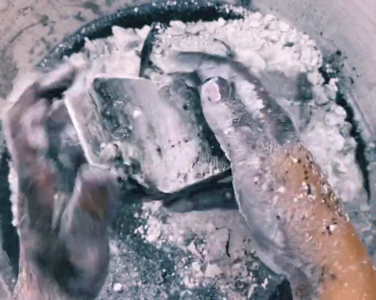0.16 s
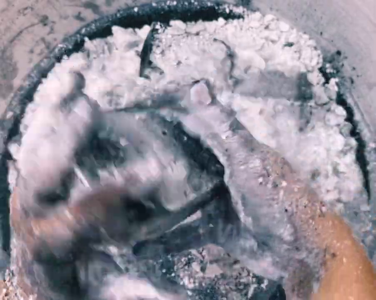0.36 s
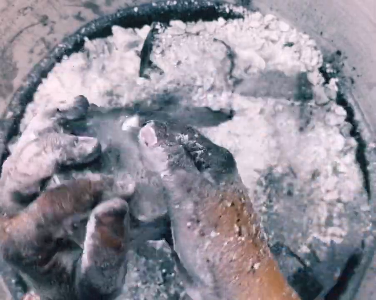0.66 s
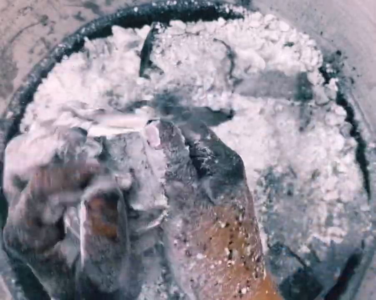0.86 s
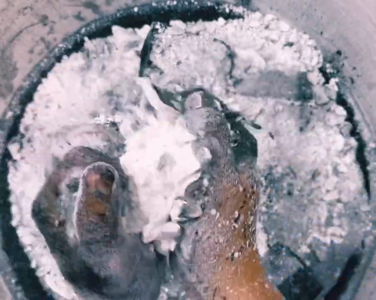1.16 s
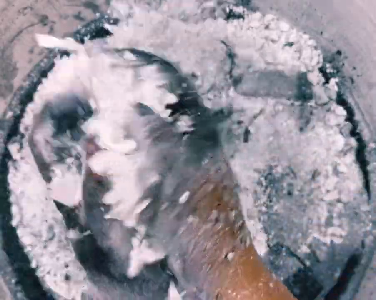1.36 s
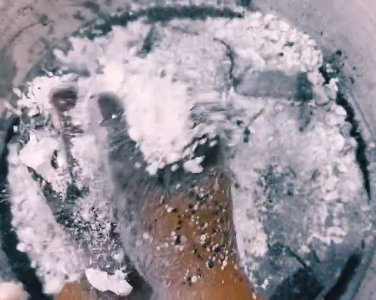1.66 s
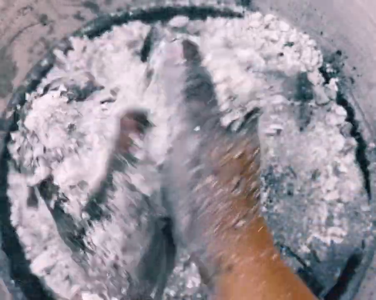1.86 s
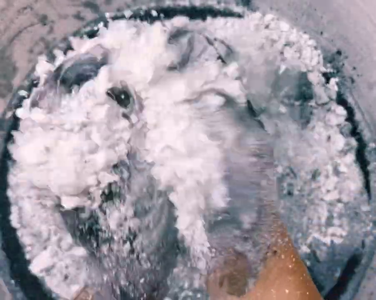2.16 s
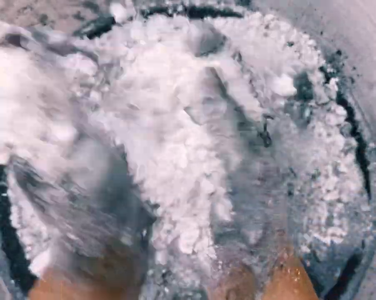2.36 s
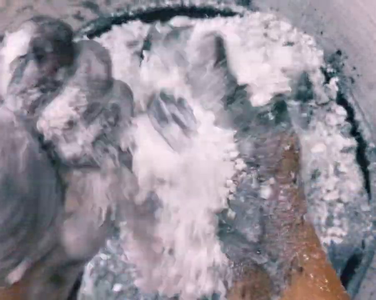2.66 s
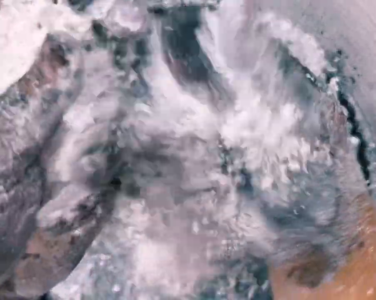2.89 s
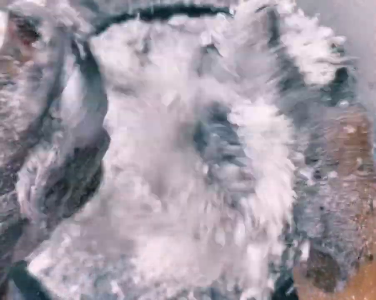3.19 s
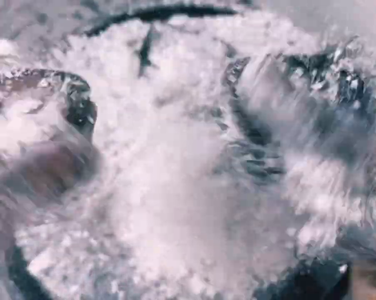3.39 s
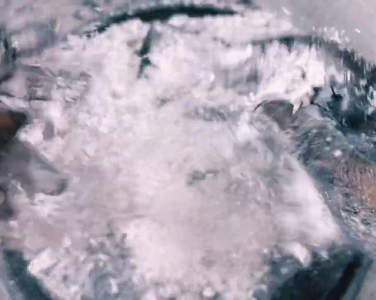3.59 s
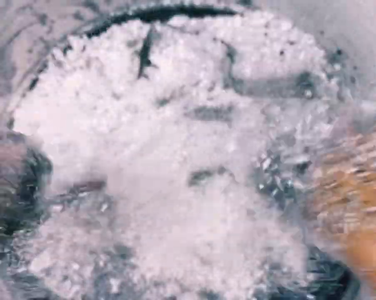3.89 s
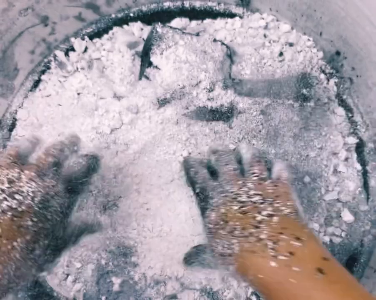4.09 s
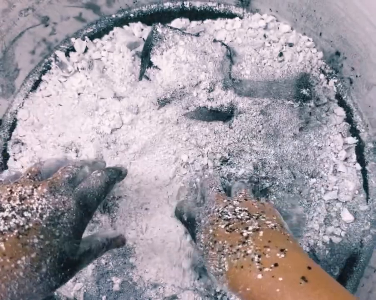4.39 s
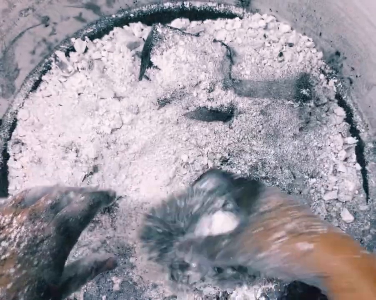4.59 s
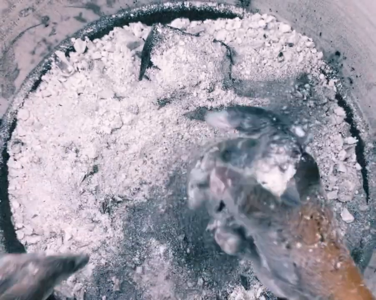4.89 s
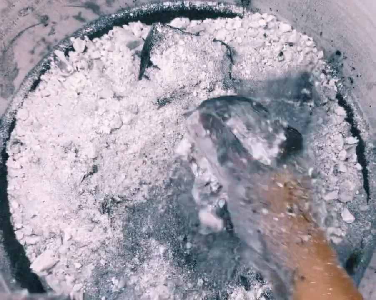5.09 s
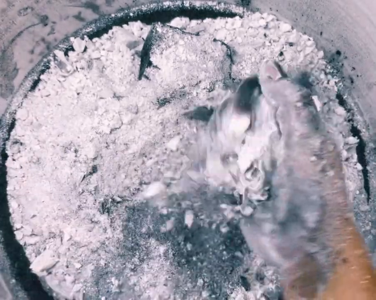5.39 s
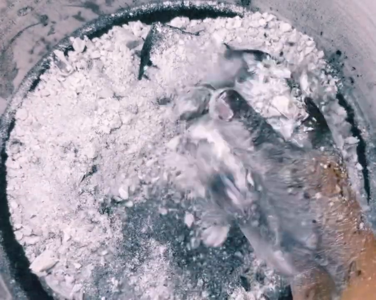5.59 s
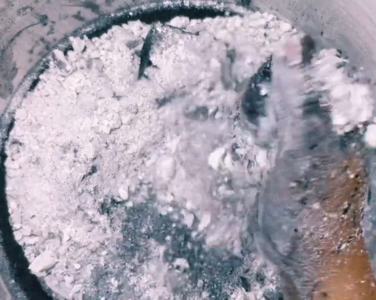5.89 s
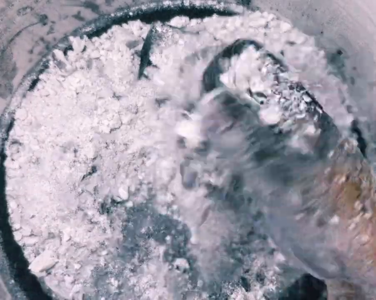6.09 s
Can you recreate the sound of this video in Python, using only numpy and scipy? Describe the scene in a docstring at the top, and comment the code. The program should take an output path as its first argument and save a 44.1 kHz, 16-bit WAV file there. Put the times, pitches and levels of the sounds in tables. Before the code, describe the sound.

In a small, faintly humming room, hands rub a chalk block and crush it with crisp cracks and a crackling collapse, heard up close. Gritty crunches follow as pieces fall, knocking against a plastic bowl and making its bottom boom. The crumbling thins, a hand sweeps past with a low puff of air and a thump, and a second burst of snapping trails off into crumbs and light clinks of charcoal.

```python
"""Fingers rasp over dry chalk, close by, as a hand sweeps past and crumbs trickle into a plastic bowl.
A block cracks in sharp snaps and collapses in a rush of tiny fractures; squeeze after squeeze grinds it
to grit. Lumps knock on the bowl's wall and heavy handfuls make its bottom boom. Late on, more chalk
snaps and hard bits of charcoal clink. A small room hums behind."""
import sys
import numpy as np
from scipy import signal
from scipy.fft import rfft, irfft
from scipy.io import wavfile

SR = 44100
rng = np.random.default_rng(int(sys.argv[2]) if len(sys.argv) > 2 else 0)


def persist_wave(psi):
    """Save psi, clipped to +-1, as 16-bit WAV."""
    counts = np.round(np.clip(psi, -1, 1) * 32767).astype(np.int16)
    wavfile.write(sys.argv[1], SR, np.atleast_2d(counts).T)


N = 275623
TIME_S = np.arange(N) / SR
AGE_S = TIME_S[:SR // 2]  # time since an onset


def undb(db):
    """Decibels to gain."""
    return 10 ** (np.asarray(db) / 20)


def unit(x):
    """Scale to rms 1."""
    return x / np.sqrt(np.mean(x ** 2) + 1e-18)


def curve(points):
    """(time [s], value) points, interpolated per sample."""
    return np.interp(TIME_S, *np.transpose(points))


def add(out, time_s, sound):
    """Mix a sound in at time_s."""
    i = max(int(time_s * SR), 0)
    out[i:i + len(sound)] += sound[:max(N - i, 0)]


def colour(x, points, size=8192):
    """Minimum-phase filter through (frequency [Hz], gain [dB]) points; white noise keeps its level."""
    hz, db = np.transpose(points)
    octave = np.log2(np.maximum(np.fft.rfftfreq(size, 1 / SR), 1))
    outside_oct = np.abs(octave - np.clip(octave, np.log2(hz[0]), np.log2(hz[-1])))
    gain = undb(np.interp(octave, np.log2(hz), db) - 20 * outside_oct)
    cepstrum = irfft(np.log(gain))[:size // 2]
    cepstrum[1:] *= 2
    response = irfft(np.exp(rfft(cepstrum, size)))
    return signal.fftconvolve(x, response / np.linalg.norm(response))[:len(x)]


def resonate(x, hz, q):
    """Two-pole resonance."""
    hz = min(hz, .3 * SR)
    return signal.lfilter(*signal.iirpeak(hz, max(q, hz / (.4 * SR)), fs=SR), x)


def ring(modes, weights=1, pitch_ratio=1):
    """Decaying sines of a struck object."""
    hz, db, t60_s = np.transpose(modes)
    waves = np.sin(2 * np.pi * np.outer(hz * pitch_ratio, AGE_S))
    decay = np.exp(-np.log(1000) * AGE_S / t60_s[:, None])
    return (undb(db) * weights) @ (waves * decay)


def wander(rate_hz):
    """Random drift, spread near 1, with about rate_hz knots a second."""
    knots_s = np.cumsum(rng.uniform(.4, 1.6, N // 100)) / rate_hz
    return 1.2 * np.interp(TIME_S, knots_s, rng.standard_normal(len(knots_s)))


def burst(hz, q, fade_s):
    """A fragment shivers around its pitch and dies away; energy of a fading unit noise."""
    fade = np.exp(-AGE_S[:SR // 12] / fade_s)
    noise = rng.standard_normal(len(fade))
    shiver = resonate(resonate(noise, hz, q), hz, q) * fade
    return shiver * np.linalg.norm(fade) / np.linalg.norm(shiver)


def grains(per_s, spread_db, fade_s, low_hz=1200, high_hz=15000, bands=36, size=320):
    """Tiny fractures at random moments, many faint, few strong; rms 1."""
    out = np.zeros(N)
    per_band = int(per_s * N / SR / bands)
    for hz in np.geomspace(low_hz, high_hz, bands):
        when, chance, side = rng.random((N // bands, 3))[:per_band].T
        strength = undb(-spread_db * np.log(chance + .008)) * np.sign(side - .5)
        clicks = np.bincount((when * N).astype(int), strength, N)
        grain = burst(hz, .9, fade_s)[:size] * np.sqrt(hz)  # wider band, more energy
        out += signal.oaconvolve(clicks, grain)[:N]
    return unit(out)


# finger strokes: (time [s], level [dB], length [s], lowest resonance [Hz])
RUBS = [(0, -42.5, 0.088, 4400), (0.199, -41, 0.17, 4300), (0.448, -41, 0.13, 4030),
        (1.49, -35, 0.021, 3450), (2.7, -48, 0.049, 3700), (2.838, -40, 0.035, 3570),
        (3.655, -46, 0.11, 4400), (4.178, -49, 0.027, 3500), (4.621, -30.5, 0.023, 3800),
        (6.115, -38, 0.04, 3270)]
# rubbed block: (frequency / lowest resonance [ratio], gain [dB])
BLOCK_MODES = [(1, 14.5), (1.48, 10), (2.45, -1.5)]


def rubs(slips_db=-3):
    """Skin drags over chalk: tiny slips merge into a rasp that excites the block."""
    out = np.zeros(N)
    for time_s, db, length_s, hz in RUBS:
        noise = rng.standard_normal(len(AGE_S))
        slips = colour(noise, [(1500, -3), (4000, -1), (11000, 8.5), (16000, 4.5)])
        block = sum(undb(mode_db) * resonate(slips, hz * ratio, q=7) for ratio, mode_db in BLOCK_MODES)
        rasp = unit(unit(block) + undb(slips_db) * unit(slips))
        stroke = np.sqrt(np.abs(np.sin(np.pi * np.minimum(AGE_S / length_s, 1))))
        add(out, time_s, undb(db) * rasp * stroke)
    return out


# crumb flow into the bowl: (time [s], level [dB])
TRICKLE = [(0, -53.5), (0.55, -53.5), (1.0, -40.5), (1.7, -38), (2.15, -43), (2.75, -37.5), (3.02, -44.5),
           (4.0, -46.5), (4.06, -62), (4.5, -59.5), (4.6, -49), (5.5, -46), (5.95, -42), (6.25, -49.5)]
# fingers closing on a lump: (time [s], length [s], grit level [dB], crumb level [dB])
SQUEEZES = [(0.601, 0.031, -26, -31), (0.7, 0.15, -34.5, -60), (0.79, 0.074, -29.5, -48),
            (0.896, 0.056, -33.5, -36.5), (0.978, 0.035, -55, -34.5), (1.097, 0.097, -33.5, -35.5),
            (1.337, 0.042, -38, -25.5), (1.479, 0.041, -32.5, -30.5), (1.83, 0.016, -44, -61),
            (1.917, 0.19, -46, -50), (2.843, 0.071, -38, -43), (3.04, 0.26, -45.5, -46.5),
            (3.911, 0.066, -51, -43), (4.127, 0.24, -63, -52), (4.552, 0.092, -46, -58),
            (4.822, 0.046, -23.5, -28.5), (4.922, 0.18, -39.5, -54), (5.155, 0.052, -43.5, -46),
            (5.634, 0.052, -40.5, -46), (5.919, 0.14, -48, -44.5)]
# fine grit, coarse crumbs: (frequency [Hz], gain [dB])
GRIT_SPECTRUM = [(1100, 3), (1900, 2.5), (3000, 7.5), (4200, 6), (6300, 5.5), (8500, 1), (11000, 3),
                 (14000, 1.5), (16000, -5)]
CRUMB_SPECTRUM = [(120, -25), (260, 16), (500, 8), (900, 6), (1800, 7.5), (3000, -1), (6000, 4.5)]


def kneading(coarse_db=-6, chips_db=10):
    """Grit, chips and crumbs trickle in uneven surges; each squeeze grinds out more."""
    flow = undb(curve(TRICKLE))
    grit_power, crumb_power = flow ** 2, (flow * undb(coarse_db)) ** 2
    for time_s, length_s, grit_db, crumb_db in SQUEEZES:
        force = grip(time_s, length_s)
        grit_power += (undb(grit_db) * force) ** 2
        crumb_power += (undb(crumb_db) * force) ** 2
    surge_db = 1.3 * wander(rate_hz=50)
    fine = grains(per_s=4200, spread_db=3.5, fade_s=.0012)
    grit = unit(colour(fine, GRIT_SPECTRUM)) + undb(chips_db) * chips()
    coarse = grains(per_s=1300, spread_db=3, fade_s=.0017, low_hz=224, high_hz=3370)
    crumbs = unit(colour(coarse, CRUMB_SPECTRUM))
    return (grit * np.sqrt(grit_power) + crumbs * np.sqrt(crumb_power)) * undb(surge_db)


def grip(time_s, length_s, rise_s=.021, relax_s=.039):
    """Force of one squeeze: builds, holds, relaxes."""
    age_s = TIME_S - time_s
    return np.clip(age_s / rise_s, 0, 1) * np.exp(-np.maximum(age_s - length_s, 0) / relax_s)


def chips(per_s=26, spread_db=3, centre_hz=4500, range_oct=1.04):
    """Stray chips break off, each a dry tick at its own pitch."""
    out = np.zeros(N)
    for when, chance, pitch in rng.random((int(per_s * N / SR), 3)):
        tick = burst(centre_hz * 2 ** (range_oct * (2 * pitch - 1)), q=.7, fade_s=.0009)
        add(out, when * N / SR, undb(-spread_db * np.log(chance + .1)) * tick)
    return out


# hand passes that shift the bowl: (time [s], length [s], rumble level [dB], air level [dB])
SWEEPS = [(-.06, 0.13, -35.5, -59), (1.298, 0.5, -30, -59), (3.12, 0.31, -35.5, -45),
          (4.058, 0.38, -32, -26), (4.415, .2, -60, -37.5), (5.094, 0.23, -39.5, -33)]
# bowl rumble: (frequency [Hz], gain [dB])
RUMBLE_SPECTRUM = [(35, -30), (70, 4.5), (100, 3), (150, -5), (190, -12), (240, -15.5), (400, -22.5),
                   (800, -27.5)]


def handling(landing_db=3.5):
    """Falling crumbs rumble the bowl; a sweeping hand swells this and blows air at the microphone."""
    load, draught = undb(curve(TRICKLE) + landing_db), np.zeros(N)
    for time_s, length_s, rumble_db, air_db in SWEEPS:
        speed = np.sin(np.pi * np.clip((TIME_S - time_s) / length_s, 0, 1))
        load = np.hypot(load, undb(rumble_db) * speed)
        draught += undb(air_db) * speed
    rumble = colour(rng.standard_normal(N), RUMBLE_SPECTRUM)
    air = colour(rng.standard_normal(N), [(14, -21), (28, 3), (45, -9), (80, -18), (160, -41)])
    return rumble * load + air * draught


# room background: (frequency [Hz], gain [dB])
HUM_SPECTRUM = [(20, -6), (35, 3.5), (65, 1), (110, -14), (220, -11), (330, -18), (700, -29), (1500, -31),
                (3000, -39), (16000, -37.5)]


def hum(level_db=-42.5):
    """Steady room noise: low hum, faint hiss."""
    return undb(level_db) * colour(rng.standard_normal(N), HUM_SPECTRUM)


# blocks giving way: (time [s], level [dB], fade [s], relative body level [dB])
COLLAPSES = [(0.348, -30, 0.011, -8), (0.596, -19, 0.07, -7.5), (0.652, -28, 0.012, -26),
             (0.83, -23.5, 0.062, -7), (1.14, -24.5, 0.038, -25), (1.36, -33.5, 0.14, 3),
             (2.547, -26, 0.042, -2.5), (4.843, -18.5, 0.021, -3), (4.92, -25, 0.04, -12.5),
             (5.595, -30, 0.024, -1.5)]
# splinters, big pieces: (frequency [Hz], gain [dB])
SPLINTER_SPECTRUM = [(400, -85), (1300, 10.5), (2600, 2), (4000, 9.5), (6500, 2.5), (11000, 3.5),
                     (16000, -3)]
PIECE_SPECTRUM = [(70, -27), (190, 13.5), (330, -2), (500, -27), (800, -5.5), (1500, -8), (3500, -15.5)]


def collapses(rise_s=.00062):
    """A block fails in a fading avalanche of fractures; big pieces give it body."""
    crackle, body = np.zeros(N), np.zeros(N)
    for time_s, db, fade_s, body_db in COLLAPSES:
        rush = undb(db) * (1 - np.exp(-AGE_S / rise_s)) * np.exp(-AGE_S / fade_s)
        add(crackle, time_s, rush)
        add(body, time_s, rush * undb(body_db))
    fine = grains(per_s=3800, spread_db=3.3, fade_s=.0005)
    coarse = grains(per_s=4000, spread_db=4.5, fade_s=.00071, low_hz=185, high_hz=3680)
    return crackle * unit(colour(fine, SPLINTER_SPECTRUM)) + body * unit(colour(coarse, PIECE_SPECTRUM))


# cracks in the chalk: (time [s], level [dB], fragment pitch [Hz])
SNAPS = [(0.473, -23.5, 5500), (0.5778, -23, 12000), (0.588, -19, 3800), (0.5971, -5.5, 5800),
         (0.6016, -6.5, 7650), (0.6062, -2, 7040), (0.622, -5, 3900), (0.6278, -9, 4200),
         (0.6623, -4.5, 5500), (0.6631, -7.5, 4800), (0.6808, -10, 3750), (0.7061, -10, 1900),
         (0.728, -17, 7000), (0.7422, -12.5, 4770), (0.7683, -10.5, 3950), (0.7818, -10.5, 4200),
         (0.8458, -4, 5200), (0.9009, -13, 5770), (0.941, -11.5, 1980), (1.1418, -19, 3940),
         (1.154, -12, 4050), (1.2237, -13, 4200), (1.602, -16.5, 5760), (1.6122, -17.5, 1900),
         (1.8112, -29, 4800), (1.851, -24, 3930), (2.1342, -23.5, 4650), (2.2107, -24, 4100),
         (2.2233, -21, 3570), (2.431, -23, 3800), (3.0574, -23.5, 2750), (3.087, -25, 1740),
         (3.495, -27, 4200), (3.5253, -20, 5860), (3.664, -25, 5800), (3.8345, -23.5, 9500),
         (3.9411, -27, 3400), (4.001, -25, 4460), (4.8133, -20, 3000), (4.829, -7, 4800),
         (4.8452, -5, 3980), (4.8588, -3.5, 3730), (4.8865, -9.5, 4400), (4.9146, -6.5, 4040),
         (4.9598, -9, 4850), (4.9864, -15.5, 7400), (5.052, -14, 7000), (5.2922, -20, 11000),
         (5.595, -31, 2400), (5.809, -22, 7100), (5.965, -22, 3000), (6.0177, -15.5, 3200),
         (6.073, -25, 4780)]


def snaps(dust_db=-11, dust_db_per_db=.89):
    """A crack rings its fragment for a millisecond; stronger cracks spill more dust."""
    out = np.zeros(N)
    for time_s, db, hz in SNAPS:
        crack = burst(hz, q=.62, fade_s=.0007)
        dust = burst(hz, q=.48, fade_s=.0038)
        add(out, time_s, undb(db) * crack + undb(dust_db + dust_db_per_db * db) * dust)
    return out


# lumps striking the bowl: (time [s], level [dB], favoured pitch [Hz])
KNOCKS = [(0.606, -18.5, 190), (0.6275, -18, 1390), (0.939, -21, 270), (0.977, -17, 850),
          (1.0765, -12.5, 1600), (1.234, -22.5, 290), (1.371, -16.5, 1100), (1.569, -24, 750),
          (1.6554, -9, 1250), (1.7185, -7.5, 800), (1.73, -14, 825), (2.372, -29, 1510), (2.462, -27, 980),
          (2.498, -23, 1280), (2.555, -10, 1220), (2.5775, -9.5, 1270), (2.772, -26.5, 306),
          (3.272, -27, 1920), (4.177, -31, 350), (4.479, -35, 477), (4.845, -15, 286), (4.8595, -14, 1200),
          (5.207, -33.5, 475)]
# bowl wall: (frequency [Hz], level [dB], t60 [s])
WALL_MODES = [(243, -4, .08), (360, -7, .08), (506, -4, .1), (641, -5, .13), (712, -1, .14), (853, 0, .14),
              (941, -3, .14), (1017, -3, .12), (1130, -3, .11), (1245, -2, .13), (1567, -5, .1),
              (1760, -7, .08), (2530, -8, .07)]


def knocks(reach_oct=.53, rattle_db=2.5, scatter_db=-7, contact_db=-1.5, crunch_db=-17):
    """Lumps hit the wall, crumble and scatter; hard ones wake high modes, soft ones low."""
    out = np.zeros(N)
    mode_hz = np.transpose(WALL_MODES)[0]
    for time_s, db, hz in KNOCKS:
        spot_mix = rng.choice([-1, 1], len(mode_hz)) * rng.uniform(.47, 1.4, len(mode_hz))
        excitation = np.exp(-.5 * (np.log2(mode_hz / hz) / reach_oct) ** 2)
        wall = ring(WALL_MODES, spot_mix * excitation, pitch_ratio=1 + .018 * rng.standard_normal())
        blow = wall / np.std(wall[:SR // 100])
        add(blow, 0, undb(rattle_db) * burst(hz, q=.7, fade_s=.005))
        add(blow, 0, undb(scatter_db) * burst(hz, q=1.3, fade_s=.022))
        add(out, time_s, undb(db) * blow / np.abs(blow).max())
        add(out, time_s, undb(db + contact_db) * burst(hz + 210, q=.62, fade_s=.0007))
        add(out, time_s, undb(db + crunch_db) * burst(hz=1940, q=.77, fade_s=.0083))
    return out


# soft blows: (time [s], level [dB], push length [s])
THUMPS = [(0.607, -34, 0.0015), (1.001, -23, 0.0018), (1.204, -23, 0.004), (1.364, -24.5, 0.0047),
          (1.512, -27, 0.0028), (1.577, -23.5, 0.0021), (1.729, -13, 0.0078), (2.579, -14.5, 0.0036),
          (2.776, -25, 0.0032), (4.188, -10, 0.011), (4.221, -13, 0.011), (5.236, -30, 0.0044)]
# bowl bottom: (frequency [Hz], level [dB], t60 [s])
BOTTOM_MODES = [(79.4, -61, 0.15), (99.4, -2.5, 0.43), (141.2, -0.5, 0.23), (219, -1.5, 0.096),
                (284, -28, 0.11)]


def thumps():
    """Heavy handfuls push on the bottom, which booms; a longer push sounds duller."""
    out = np.zeros(N)
    for time_s, db, push_s in THUMPS:
        push = np.sin(np.pi * np.minimum(AGE_S / push_s, 1))
        boom = ring(BOTTOM_MODES, pitch_ratio=1 + .0081 * rng.standard_normal())
        add(out, time_s, undb(db) * signal.fftconvolve(boom, push / push.sum())[:len(AGE_S)])
    return out


# blows on charcoal: (time [s], level [dB], tilt [dB/octave])
CLINKS = [(5.4149, -33, -9), (5.873, -38.5, -20), (6.017, -29.5, 4.5)]
# charcoal piece: (frequency [Hz], level [dB], t60 [s])
CHARCOAL_MODES = [(2760, 5, 0.074), (3170, -9, 0.14), (4400, -11, 0.064), (4560, -8, 0.088),
                  (4800, -16, 0.13)]


def clinks(tick_db=12, clatter_db=-1, chatter_depth=.67):
    """Hard charcoal ticks, rings and clatters as it settles; sharper blows favour upper modes."""
    out = np.zeros(N)
    mode_hz = np.transpose(CHARCOAL_MODES)[0]
    for time_s, db, tilt_db_per_oct in CLINKS:
        weights = undb(tilt_db_per_oct * np.log2(mode_hz / mode_hz[0]))
        chatter = 1 + chatter_depth * wander(rate_hz=290)[:len(AGE_S)]  # crumbs roughen the ring
        add(out, time_s, undb(db + tick_db) * burst(mode_hz[1], q=1.1, fade_s=.001))
        add(out, time_s, undb(db) * ring(CHARCOAL_MODES, weights) * chatter)
        add(out, time_s, undb(db + clatter_db) * weights[-1] * burst(mode_hz[-1], q=3, fade_s=.016))
    return out


def room(x, wet_db=-13, t60_s=.033, delay_s=.004):
    """Add a small room's faint, quick reflections."""
    decay = np.exp(-np.log(1000) * AGE_S / t60_s) * (AGE_S > delay_s)
    tail = rng.standard_normal(len(AGE_S)) * decay
    tail = colour(tail, [(150, -25), (700, -3.5), (5000, 3), (16000, -6)])
    return x + undb(wet_db) * signal.fftconvolve(x, tail / np.linalg.norm(tail))[:N]


def scene():
    """Chalk, charcoal and bowl in the humming room; mono."""
    contents = snaps() + collapses() + kneading() + rubs() + clinks()
    bowl = knocks() + thumps() + handling()
    background = hum()
    return (room(contents + bowl) + background)[None]


def record(dry):
    """Clip at full scale, then low-pass at 16.1 kHz."""
    lowpass = signal.ellip(10, .2, 70, 16100, fs=SR, output="sos")
    return signal.sosfilt(lowpass, np.clip(dry, -1, 1))


dry = scene()
out = record(dry)
persist_wave(out)
```